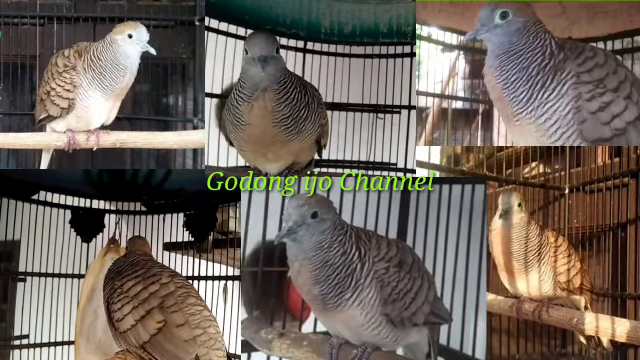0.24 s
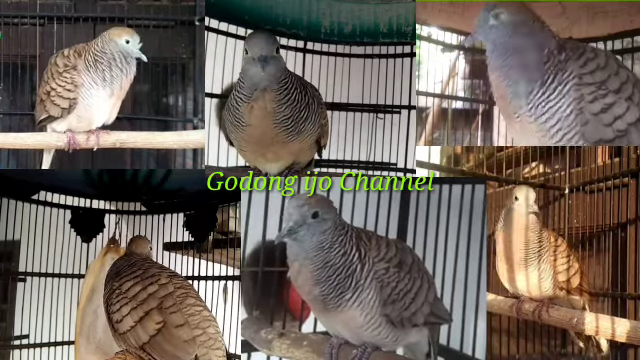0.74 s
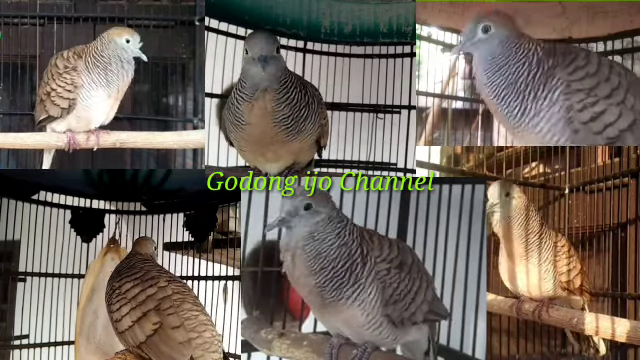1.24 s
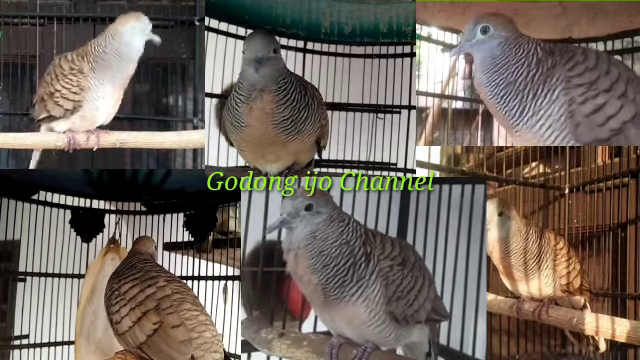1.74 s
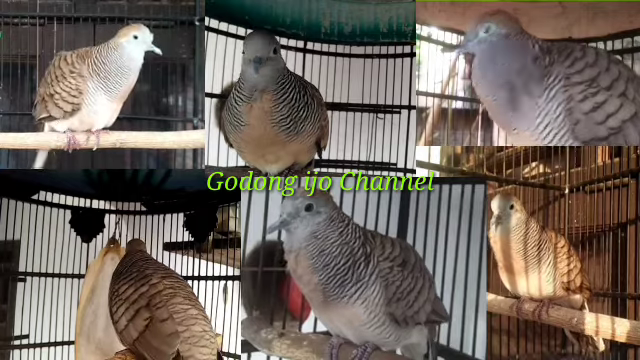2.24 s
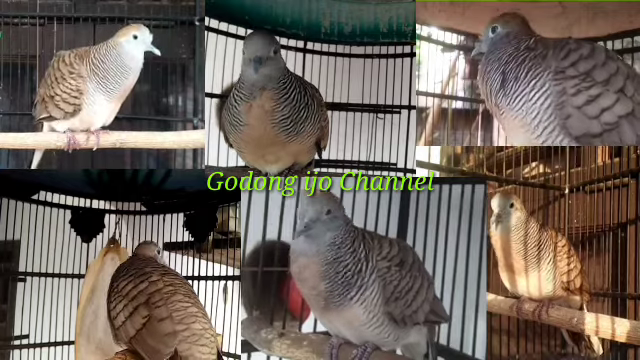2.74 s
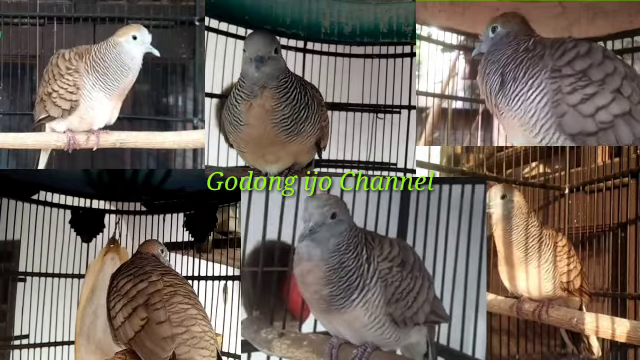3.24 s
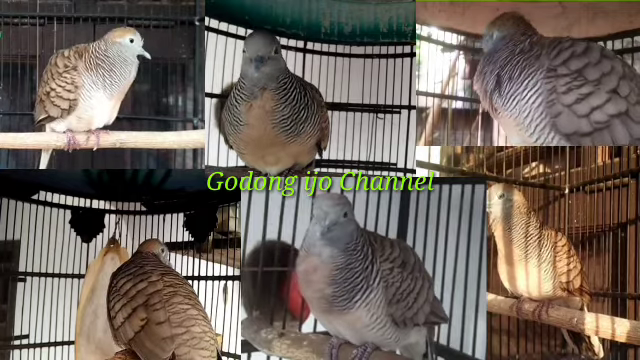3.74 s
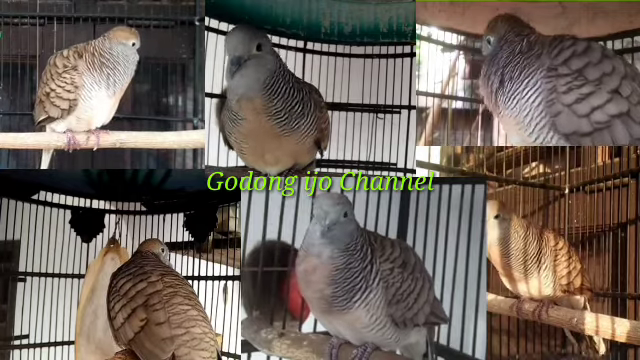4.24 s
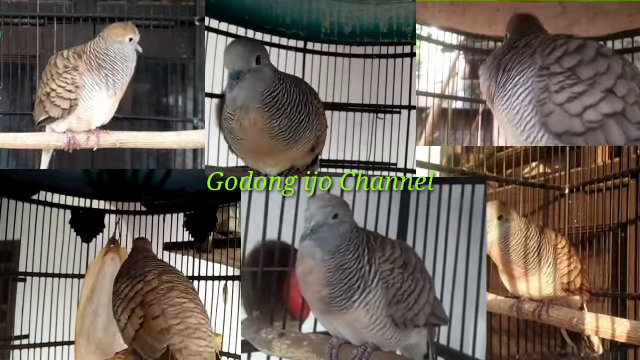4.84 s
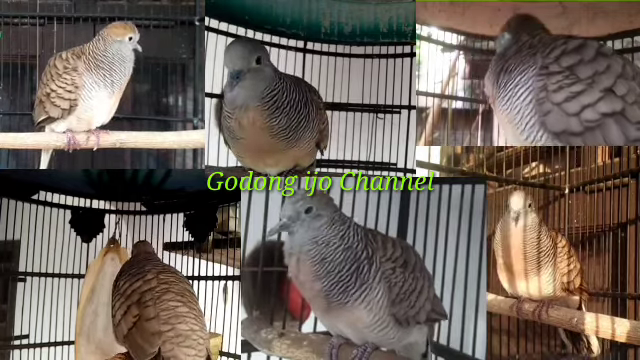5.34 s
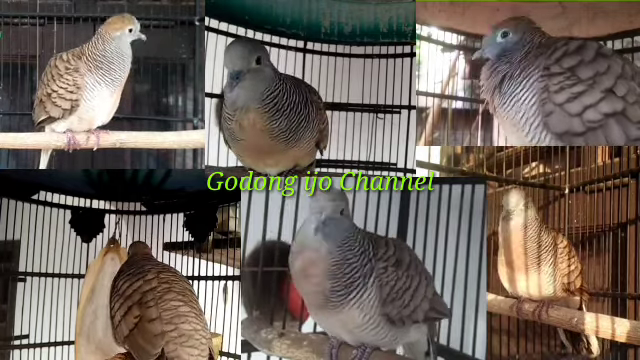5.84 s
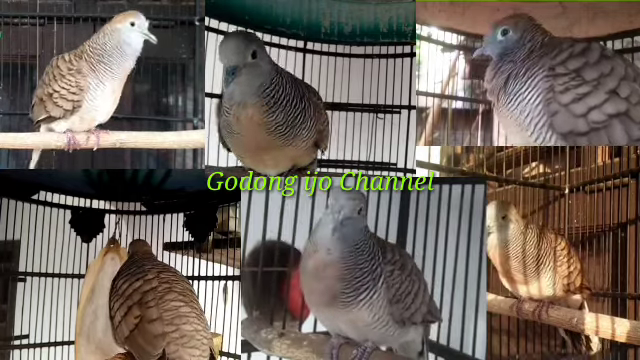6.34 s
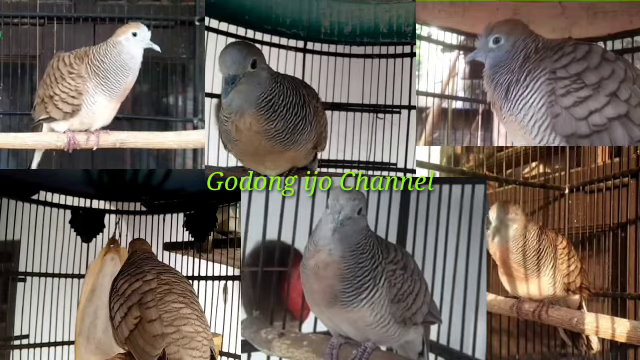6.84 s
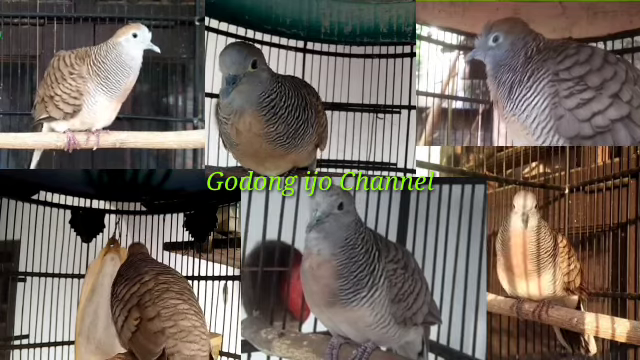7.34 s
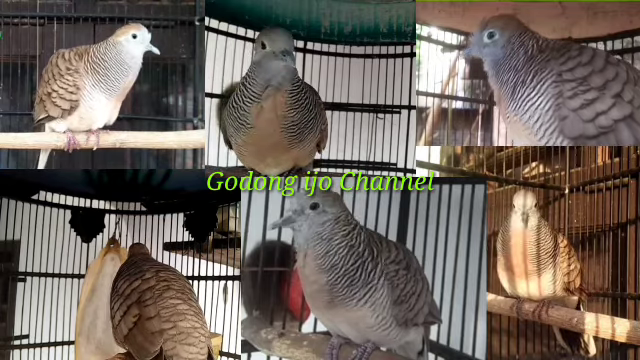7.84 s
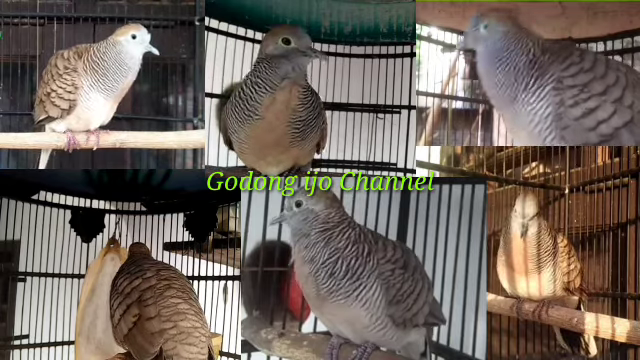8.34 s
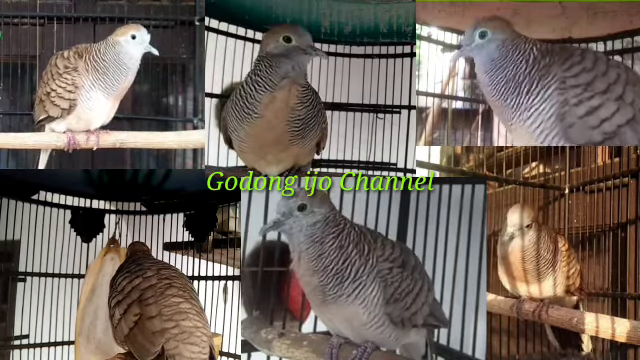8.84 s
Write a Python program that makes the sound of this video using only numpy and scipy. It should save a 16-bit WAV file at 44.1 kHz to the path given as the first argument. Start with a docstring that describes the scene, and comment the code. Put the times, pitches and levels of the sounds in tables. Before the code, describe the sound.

Caged zebra doves sing short, trilled, nearly pure-toned coos over one another, near and far, with faint small-bird chirps and low outdoor rumble.

```python
"""Caged zebra doves sing over one another, some close, some further off; each repeats its own short trilled song.
Each coo is an almost pure tone that scoops up and droops, with thin overtones and a short echo.
A husky puff of band-passed noise leads in many coos, and faint hiss follows the singing.
Small birds chirp in gliding whistles and a far-off bird cries once, a reedy harmonic tone,
over quiet outdoor noise with a low rumble, a mains hum and two dull knocks."""
import sys
import numpy as np
from scipy import signal
from scipy.fft import rfft, irfft
from scipy.io import wavfile
from scipy.ndimage import uniform_filter1d, map_coordinates

SR = 44100
rng = np.random.default_rng(int(sys.argv[2]) if len(sys.argv) > 2 else 0)


def wrap_up_sound(samples):
    """Save the sound to the file named by the first command line argument, as 16-bit audio."""
    columns = np.atleast_2d(samples).T
    # keep every value between -1 and 1, then stretch to whole-number steps
    tamed = np.clip(columns, -1, 1)
    steps = np.round(tamed * 32767).astype(np.int16)
    wavfile.write(sys.argv[1], SR, steps)


N = 400428

# coos of each song: onset_s (before stretch), length_s, top_hz (before pitch ratio),
# level_db (re bout), scoop (share of pitch), droop (share of pitch)
LOUD_SONG = [(0, .072, 1277, 2.1, .56, .08), (.07, .05, 1257, .4, .16, .12),
             (.124, .051, 1223, -.3, .37, .15), (.2, .045, 1182, .3, .3, .15),
             (.3, .05, 1213, .2, .42, .15), (.412, .12, 1228, -.8, .42, .1)]
BRISK_SONG = [(0, .052, 1189, 0, .35, .21), (.051, .05, 1186, 0, .32, .21),
              (.096, .048, 1152, -.5, .3, .22), (.18, .043, 1104, 1, .3, .22),
              (.279, .045, 1117, 0, .31, .22), (.395, .123, 1170, -2.8, .26, .13)]
HIGH_SONG = [(0, .074, 1396, -.5, .34, .08), (.066, .054, 1410, 2.5, .13, .08),
             (.125, .049, 1366, .8, .13, .15), (.228, .047, 1345, -.5, .4, .15),
             (.346, .054, 1360, -.5, .42, .14), (.489, .105, 1367, -1, .3, .06)]
MELLOW_SONG = [(0, .074, 1145, -2, .41, .15), (.068, .056, 1160, -2.5, .05, .1),
               (.128, .05, 1135, 1, .37, .26), (.194, .043, 1094, 2, .43, .28),
               (.279, .05, 1112, 1.7, .42, .27), (.396, .12, 1159, -2.5, .36, .18)]


def undb(db):
    """Decibels to gain."""
    return 10 ** (np.asarray(db) / 20)


def unit(x):
    """Scale to rms 1."""
    return x / np.sqrt(np.mean(x ** 2))


def add(out, start_s, x):
    """Mix a sound in at its start time."""
    i = max(int(start_s * SR), 0)
    out[i:i + len(x)] += x[:max(len(out) - i, 0)]


def noise(n):
    """White noise."""
    return rng.standard_normal(n)


def band(x, lo_hz, hi_hz, order=2):
    """Band-pass filter."""
    edges_hz = [lo_hz, min(hi_hz, .45 * SR)]
    return signal.sosfilt(signal.butter(order, edges_hz, "band", fs=SR, output="sos"), x)


def walk(n, rate_hz):
    """Smooth random wander with a spread near 1."""
    knots = noise(int(n / SR * rate_hz) + 4)
    return map_coordinates(knots, [np.arange(n) / SR * rate_hz + 1], order=2)


def fade(u):
    """Smooth step from 0 to 1."""
    return np.sin(np.pi / 2 * np.clip(u, 0, 1)) ** 2


def echo(x, wet_db, t60_s):
    """Direct sound plus scattered reflections from cage and walls, keeping the total energy."""
    t = np.arange(SR // 2) / SR
    tail = noise(len(t)) * undb(-60 * t / t60_s) * fade(t / 0.0093)
    wet = signal.fftconvolve(x, tail)
    y = wet * undb(wet_db) * np.sqrt(np.sum(x ** 2) / np.sum(wet ** 2))
    y[:len(x)] += x
    return y * np.sqrt(np.sum(x ** 2) / np.sum(y ** 2))


def background(air_db=-66.6, rumble_db=-66.3, hum_db=-76, split_hz=180):
    """Outdoor air and a swelling low rumble, both shaped noise, and a 60 Hz mains hum."""
    # noise spectrum: freq_hz, density_db (relative, per Hz)
    spectrum = [(25, -18.5), (60, -0.5), (120, -8.5), (280, -11), (380, -14.5), (650, -11.5), (1200, -11.5),
                (1700, -20), (4400, -36), (8000, -34.5), (15000, -52)]
    # rumble swell: time_s, level_db (relative to its mean)
    rumble_swell = [(0.0, -68), (0.91, -72), (1.09, -70), (2.55, -65), (2.91, -70), (4.3, -64), (4.58, -68),
                    (5.0, -71), (6.27, -64), (7.28, -70), (8.19, -71), (9.08, -69)]
    t = np.arange(N) / SR
    f = np.arange(N // 2 + 1) * SR / N + 1
    hz, density_db = np.transpose(spectrum)
    colour = undb(np.interp(np.log(f), np.log(hz), density_db))
    rumble = unit(irfft(rfft(noise(N)) * colour * (f < split_hz), N))
    air = unit(irfft(rfft(noise(N)) * colour * (f >= split_hz), N))
    swell_db = np.interp(t, *np.transpose(rumble_swell))
    rumble = rumble * undb(rumble_db + swell_db - swell_db.mean())
    hum = np.sin(2 * np.pi * 60 * t) * undb(hum_db + 2 * walk(N, 0.68))
    return hum + (air * undb(air_db) + rumble) * undb(1.5 * walk(N, 5))


def coos(bird, song):
    """Every coo of one bird: its song, stretched and pitched anew for each bout."""
    # bouts: bird, start_s, time_stretch, pitch_ratio, level_db
    bouts = [("loud", 1.543, .99, 1, -14.7), ("loud", 5.473, 1.013, 1, -14.2),
             ("brisk", 1.667, 1.01, 1, -20), ("brisk", 4.214, 1.005, 1, -20),
             ("brisk", 6.311, .997, 1, -20.3), ("brisk", 8.841, 1.01, 1, -20.3),
             ("high", 4.718, .912, 1, -28), ("high", 6.6, 1, 1, -29),
             ("mellow", 2.194, 1.005, 1.012, -23.3), ("mellow", 4.947, .985, 1, -22.5),
             ("mellow", 7.318, 1.01, .99, -22.5), ("thin", 1.272, .8, .99, -33.5),
             ("thin", 8.555, 1, 1, -32.5), ("deep", 2.022, .98, 1, -27.5), ("deep", 6.668, 1.06, 1, -28),
             ("drawling", -.171, 1, 1, -42.5), ("drawling", 3.269, 1, 1, -40.5),
             ("far brisk", .836, .95, .98, -31), ("far brisk", 3.996, .92, .98, -30.5),
             ("far brisk", 6.985, .95, .97, -31.5), ("far mellow", .265, 1, 1, -48),
             ("far mellow", .494, .9, 1.04, -40.5), ("far mellow", 3.297, 1, 1.01, -39.5),
             ("far mellow", 3.755, 1, .99, -41), ("far high", .632, .85, .99, -46),
             ("far high", 3.9, 1, 1, -49), ("far high", 7.912, .78, .96, -42.7),
             ("far high", 8.48, .9, .97, -42)]
    notes = []
    for who, start_s, stretch, ratio, bout_db in bouts:
        if who != bird:
            continue
        for onset_s, length_s, hz, db, scoop, droop in song:
            note_s = start_s + stretch * onset_s
            if note_s >= 0:
                notes.append((note_s, length_s, hz * ratio, bout_db + db, scoop, droop))
    return notes


def throat(hz, centre_hz, width_hz, cut_hz=850):
    """Gain of the inflated throat: a broad resonance that falls away steeply on the low side."""
    return 1 / np.hypot(1, (hz - centre_hz) / width_hz) / np.hypot(1, (cut_hz / hz) ** 10)


def coo(voice, throat_hz, width_hz, half_db, rise_s, rough, length_s, top_hz, db, scoop, droop,
        rasp_db=-44, onset_rasp_db=-25):
    """One note: pitch scoops up as pressure builds, then droops; the tone is huskiest until it settles."""
    t = np.arange(int(length_s * SR)) / SR
    n = len(t)
    rise_s = min(rise_s, length_s / 2)
    rising = np.clip(1 - t / rise_s, 0, 1) ** 2
    falling = np.clip((t - rise_s) / (length_s - rise_s), 0, 1) ** 2
    sag = scoop * rising + droop * falling
    waver = 0.0071 * walk(n, 130) + rough * rising * walk(n, 700)
    phase = 2 * np.pi * np.cumsum(top_hz * (1 - sag + waver)) / SR
    swell = fade(t / .016) * fade((length_s - t) / 0.014)
    # the level changes as the pitch sweeps through the resonance
    bloom = throat(top_hz * (1 - sag), throat_hz, width_hz) / throat(top_hz, throat_hz, width_hz)
    # the swollen throat lets only traces of the overtones through, mostly at full pressure
    overtones = sum(undb(d + 2 * walk(n, 63)) * np.sin(k * phase) for k, d in enumerate(voice, 2))
    # strong and weak cycles alternate: an undertone
    undertone = undb(half_db + 3 * walk(n, 63)) * np.sin(phase / 2)
    tone = bloom * np.sin(phase) + (overtones + undertone) * undb(-45 * sag)
    rasp = unit(band(noise(n), 690, 1450, order=3))
    rasp = rasp * (undb(rasp_db) + undb(onset_rasp_db) * rising)
    return undb(db) * (swell * tone + np.sqrt(swell) * rasp) * np.sqrt(2)


def dove(notes, voice, rise_s, rough, wet_db, t60_s, throat_hz=1040, width_hz=280, half_db=-62):
    """A bird's coos; each note gets its own short, scattered echo."""
    out = np.zeros(N)
    for start_s, *shape in notes:
        note = coo(voice, throat_hz, width_hz, half_db, rise_s, rough, *shape)
        add(out, start_s, echo(note, wet_db, t60_s))
    return out


def flock(lag_s=.05, blur_hz=1100, spread=0.14, blur_db=-9, scoop=.17, droop=.07, glide=.85):
    """Distant doves, glides softened; two softer coos, slightly later at scattered pitches, blur each coo."""
    # overtones from the second harmonic up: level_db (re fundamental)
    plain_voice = [-42.5, -60.5, -65.5, -54.5, -50, -56]
    # single coos: start_s, length_s, top_hz, level_db
    lone_coos = [(0, .076, 1393, -50), (.225, .076, 1355, -50), (1.383, .046, 1082, -30),
                 (2.8, .12, 1180, -44), (3.1, .07, 1150, -43), (4.53, .075, 1170, -33),
                 (6.141, .13, 1143, -43.5), (7.827, .11, 1120, -44)]
    songs = coos("far brisk", BRISK_SONG) + coos("far mellow", MELLOW_SONG) + coos("far high", HIGH_SONG)
    calls = [(*note, glide * up, glide * down) for *note, up, down in songs]
    calls += [(*lone, scoop, droop) for lone in lone_coos]
    blurs = []
    for (start_s, length_s, _, db, *_), chance in zip(calls, rng.random((len(calls), 2, 2))):
        for late, detune in chance:
            hz = blur_hz * (1 + spread * (2 * detune - 1))
            blurs.append((start_s + lag_s * late, length_s, hz, db + blur_db, scoop, droop))
    return dove(calls + blurs, plain_voice, rise_s=.025, rough=.03, wet_db=-6, t60_s=0.54)


def near_doves():
    """The nearer birds, each with its own song, overtones, throat resonance and echo."""
    # songs, columns as LOUD_SONG
    thin_song = [(0, .08, 1252, 0, .27, .04), (.06, .066, 1272, 1, .06, .06), (.123, .06, 1250, 1, .08, .1),
                 (.195, .044, 1190, -1, .33, .1), (.275, .05, 1150, -3, .3, .1),
                 (.38, .11, 1210, -3, .3, .06)]
    deep_song = [(0, .072, 846, -3, .05, .03), (.04, .135, 1050, 4, .08, .07),
                 (.145, .095, 988, 3.3, .01, .08), (.232, .07, 846, -2, .02, .07),
                 (.377, .06, 846, 1, .05, .07), (.502, .061, 846, .5, .05, .07),
                 (.637, .075, 846, .5, .05, .07), (.806, .1, 846, .5, .06, 0),
                 (.893, .115, 965, 0, .02, .15)]
    drawling_song = [(0, .23, 1007, 1, .03, .03), (.012, .068, 846, -1, .05, .06),
                     (.188, .095, 850, -1, .02, .05), (.397, .057, 846, -3, .05, .06),
                     (.516, .065, 846, -.5, .05, .06), (.658, .072, 846, 1, .05, .06),
                     (.828, .19, 843, 3.7, .04, .015)]
    # overtones from the second harmonic up: level_db (re fundamental)
    loud_voice = [-48, -62, -56, -44, -48, -64.5, -68]
    brisk_voice = [-42, -43, -48, -37, -41.5, -53.5, -57, -65]
    high_voice = [-33, -42, -33.5, -21.5, -41.5, -41.5, -55, -69.5]
    mellow_voice = [-36.5, -45.5, -61, -49.5, -36.5, -50, -53, -71]
    thin_voice = [-46.5, -47, -48, -35.5, -47, -55]
    low_voice = [-39, -54, -60, -64.5, -58, -45, -55]
    # the deep and drawling birds share a voice
    low = dove(coos("deep", deep_song) + coos("drawling", drawling_song), low_voice,
               rise_s=.033, rough=0.035, wet_db=-10, t60_s=0.5, half_db=-51)
    thin = dove(coos("thin", thin_song), thin_voice, rise_s=0.035, rough=.012, wet_db=-12, t60_s=0.18,
                throat_hz=960, width_hz=140)
    loud = dove(coos("loud", LOUD_SONG), loud_voice, rise_s=0.028, rough=0.032, wet_db=-16, t60_s=0.31,
                throat_hz=1170)
    brisk = dove(coos("brisk", BRISK_SONG), brisk_voice, rise_s=.025, rough=0.075, wet_db=-6, t60_s=0.14,
                 half_db=-50)
    mellow = dove(coos("mellow", MELLOW_SONG), mellow_voice, rise_s=0.048, rough=0.015, wet_db=-9.5,
                  t60_s=0.24, throat_hz=980, width_hz=190, half_db=-41)
    high = dove(coos("high", HIGH_SONG), high_voice, rise_s=0.04, rough=0.018, wet_db=-14, t60_s=0.31,
                throat_hz=1080, width_hz=65)
    return low + thin + overload(loud) + brisk + mellow + high


def hiss(doves, follow_db=-58, hiss_hz=5600, mid_db=-2, low_db=-51):
    """A faint rush of air rises and falls with the cooing; a few times a hiss swells up and sinks away."""
    # swells: start_s, length_s, level_db
    hiss_swells = [(1.53, .6, -74), (4.0, .5, -79), (5.7, .57, -64.5)]
    attack_s, sag_db_per_s, release_s = .06, 9, .25
    t = np.arange(N) / SR
    effort = np.sqrt(np.abs(uniform_filter1d(doves ** 2, size=4000)))
    swells = np.zeros(N)
    for start_s, length_s, db in hiss_swells:
        level = undb(db - sag_db_per_s * np.clip(t - start_s, 0, length_s))
        release = fade((start_s + length_s - t) / release_s + 1 / 2)
        swells += level * fade((t - start_s) / attack_s) * release
    treble = unit(band(noise(N), hiss_hz, 9600)) + undb(mid_db) * unit(band(noise(N), 1400, 3800))
    low = unit(band(noise(N), 260, 720)) * undb(low_db) * effort
    return low + treble * (swells + undb(follow_db) * effort) * undb(2 * walk(N, 8.1))


def bumps(decay_s=.035):
    """Dull little knocks of decaying low noise, perhaps a bird shifting on its perch."""
    # knocks: start_s, level_db (before the envelope)
    knocks = [(.325, -58), (.835, -55)]
    out, t = np.zeros(N), np.arange(SR // 4) / SR
    for start_s, db in knocks:
        thud = unit(band(noise(len(t)), 230, 650))
        add(out, start_s, thud * fade(t / .005) * np.exp(-t / decay_s) * undb(db))
    return out


def whistle(length_s, pitches_hz, db, rough):
    """One thin chirp that glides through three pitches, some way off."""
    u = np.linspace(0, 1, int(length_s * SR))
    glide_hz = np.polyval(np.polyfit([0, .5, 1], pitches_hz, 2), u)
    hz = glide_hz * (1 + rough * walk(len(u), 600))
    tone = np.sin(2 * np.pi * np.cumsum(hz) / SR) * np.sin(np.pi * u)
    return echo(tone * np.sqrt(2) * undb(db), wet_db=-5.5, t60_s=0.39)


def small_birds(count=7, twitter_hz=4600, spread=.3, glide=.1, twitter_s=.04):
    """Single whistles and rasps, and spells of short random twitters."""
    # chirps: start_s, length_s, first_hz, middle_hz, last_hz, level_db, roughness (share of pitch)
    chirps = [(0.454, 0.11, 4300, 3970, 3790, -70.5, .011), (.77, 0.198, 2900, 3920, 5036, -76, .011),
              (2.866, 0.08, 4600, 5100, 4500, -63.5, .015), (3.013, 0.023, 5646, 6430, 7160, -65, .011),
              (3.31, 0.091, 2300, 2350, 2714, -59, .045), (3.407, .13, 2200, 2196, 2028, -50.5, .03),
              (3.51, 0.068, 4600, 4700, 3860, -67, .03), (3.726, 0.11, 4400, 5250, 4300, -65.5, .011),
              (5.754, 0.24, 2850, 2860, 2798, -63, .008), (7.89, 0.25, 1990, 2000, 1980, -67, .004),
              (8.05, .04, 4900, 5500, 6100, -73, .011), (8.11, .07, 3450, 3380, 3330, -73, .015)]
    # twitter spells: start_s, length_s, level_db
    twitters = [(3.2, .5, -73), (7.85, .65, -77)]
    out = np.zeros(N)
    for start_s, length_s, first_hz, middle_hz, last_hz, db, rough in chirps:
        add(out, start_s, whistle(length_s, [first_hz, middle_hz, last_hz], db, rough))
    for start_s, length_s, db in twitters:
        for k, (late, pitch, *bend) in enumerate(rng.uniform(-1, 1, (count, 5))):
            hz = twitter_hz * (1 + spread * pitch) * (1 + glide * np.array(bend))
            add(out, start_s + length_s * (k + late / 2) / count, whistle(twitter_s, hz, db, rough=.012))
    return out


def overload(x, ceiling_db=-9.5, share=.8):
    """The very loudest peaks are mostly flattened, which adds a brief buzz."""
    ceiling = undb(ceiling_db)
    return x + share * (np.clip(x, -ceiling, ceiling) - x)


def puffs(notes, puff_db, width_s=0.011, sizzle_db=-27):
    """Unvoiced air rings a dove's throat just before the tone catches, after any silence."""
    slur_gap_s, rest_gap_s = .015, .5
    out, last_end_s = np.zeros(N), -np.inf
    t = np.arange(-SR // 25, SR // 25) / SR
    for start_s, length_s, _, db, *_ in notes:
        gap_s, last_end_s = start_s - last_end_s, start_s + length_s
        if gap_s <= slur_gap_s:
            continue
        # the puff that opens a song comes earlier and stronger
        lead_s, push_db = (.014, 5.5) if gap_s > rest_gap_s else (.002, 0)
        air = noise(len(t))
        husk = unit(band(air, 780, 1358, order=3)) + undb(sizzle_db) * unit(band(air, 6100, 6700))
        puff = husk * np.exp(-.5 * (t / width_s) ** 2) * undb(db + puff_db + push_db)
        add(out, start_s - lead_s + t[0], puff)
    return out


def lead_in_puffs():
    """Husky breath of the four nearer birds whose puffs are heard."""
    return (puffs(coos("loud", LOUD_SONG), puff_db=-27.5) + puffs(coos("brisk", BRISK_SONG), puff_db=-18)
            + puffs(coos("mellow", MELLOW_SONG), puff_db=-27) + puffs(coos("high", HIGH_SONG), puff_db=-20))


def far_cry(db=-64.5, throat_hz=2450, width_hz=520):
    """One faint, reedy, drawn-out cry, like a cockerel a long way off: harmonics through one resonance."""
    # start_s, length_s, pitch_hz
    cry = (3.95, .5, 460)
    start_s, length_s, hz = cry
    u = np.linspace(0, 1, int(length_s * SR))
    waver = 0.0067 * walk(len(u), 4.1) + 0.018 * walk(len(u), 250)
    phase = 2 * np.pi * np.cumsum(hz * (1 + waver)) / SR
    reed = sum(np.sin(k * phase) / np.hypot(1, (k * hz - throat_hz) / width_hz) for k in range(1, 16))
    out = np.zeros(N)
    add(out, start_s, echo(reed * fade(5 * u) * fade(2 * (1 - u)) * undb(db), wet_db=-7, t60_s=.3))
    return out


def scene():
    """All the doves, the other birds and the background."""
    doves = flock() + near_doves() + lead_in_puffs()
    return (background() + doves + hiss(doves) + bumps() + small_birds() + far_cry())[None]


def record(dry):
    """The recorder cuts the top: a steep elliptic low-pass."""
    top_hz = 15500
    return signal.sosfilt(signal.ellip(8, .2, 80, top_hz, fs=SR, output="sos"), dry)


dry = scene()
out = record(dry)
wrap_up_sound(out)
```